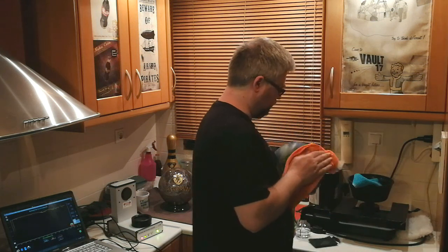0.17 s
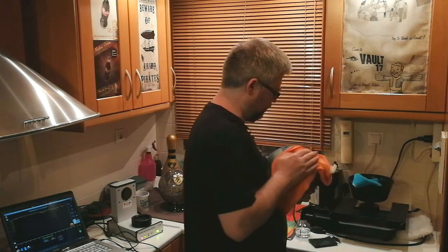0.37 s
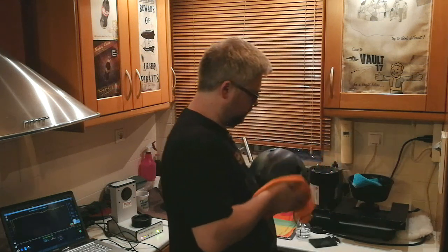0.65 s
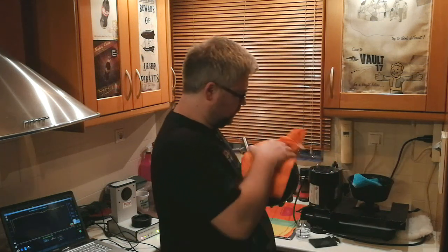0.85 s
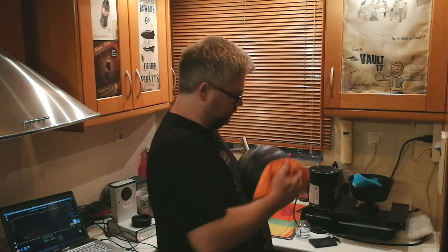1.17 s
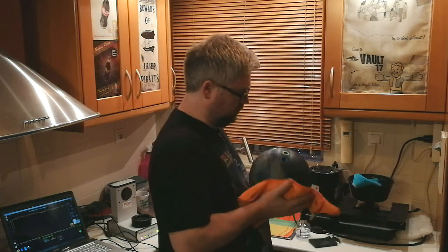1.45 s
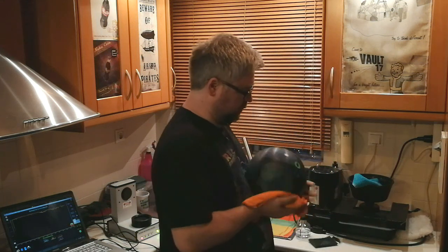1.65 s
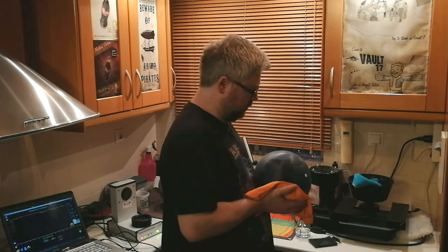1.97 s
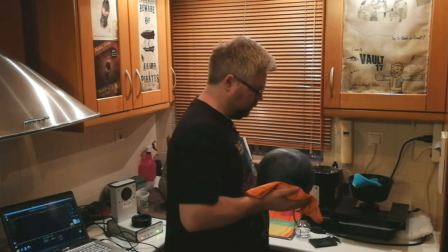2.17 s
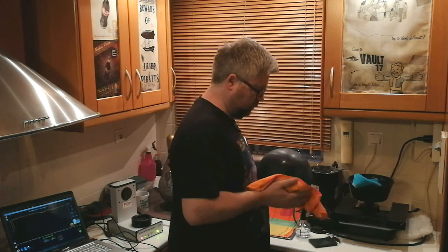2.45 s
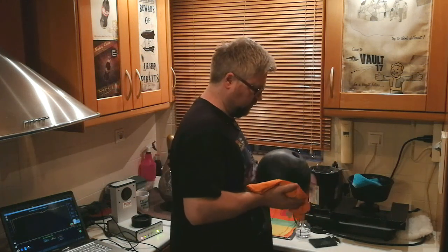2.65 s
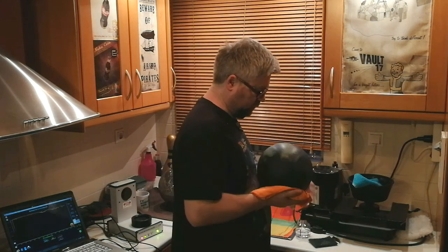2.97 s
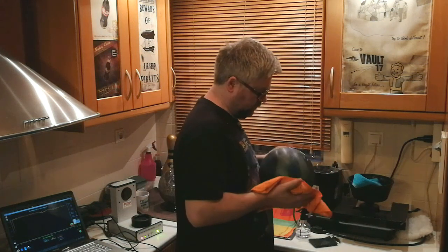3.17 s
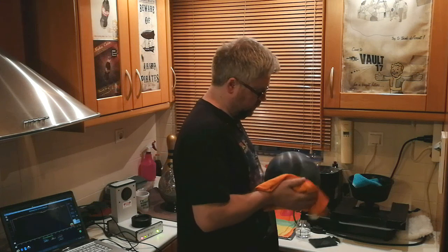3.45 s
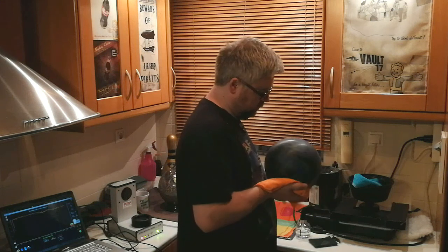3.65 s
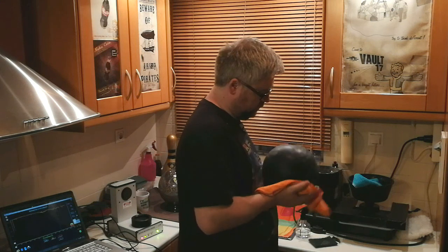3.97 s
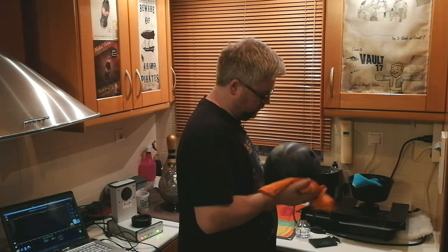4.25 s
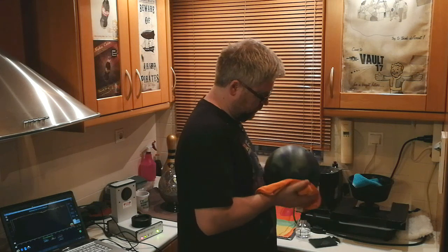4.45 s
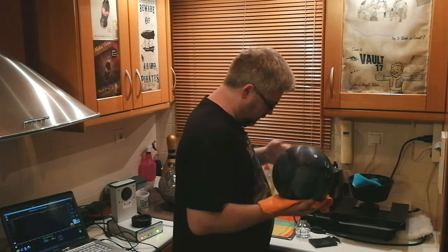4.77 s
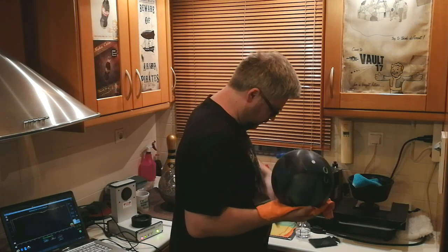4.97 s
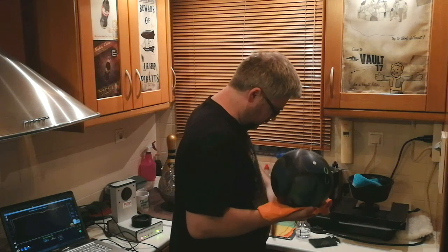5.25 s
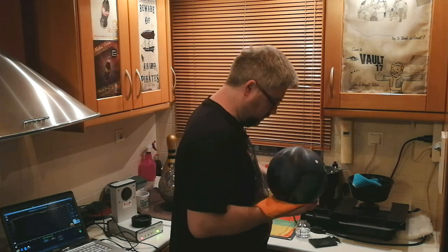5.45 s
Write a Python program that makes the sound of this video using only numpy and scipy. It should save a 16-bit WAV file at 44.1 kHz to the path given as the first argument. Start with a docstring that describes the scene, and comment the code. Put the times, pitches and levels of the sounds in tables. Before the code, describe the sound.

A cloth hisses over a bowling ball in uneven strokes throughout, close to a chest-worn microphone, with the strongest wipes from about 0.5 to 1.2 seconds. Light finger taps come around 1 second, and the ball's weight lands on the hands in soft, low thuds as it turns. Clearer clicks fall at about 2.4, 2.7, 3.1 and 3.5 seconds, some with a brief hollow note from the finger holes, followed by a sharper knock at 3.8. The fabric whistles faintly as the ball spins, mostly between 4.3 and 4.9 seconds. At 5 seconds the ball bumps the shirt with a heavy, dull knock, a short scrape and a few taps. A softer bump and scrape follow at 5.3. Dull rustling, low handling rumble and the faint steady noise of a quiet kitchen lie underneath, with almost no echo.

```python
"""A cloth hisses in uneven strokes over a bowling ball, turned close to a chest-worn microphone.
Slipping fibres make the hiss, and the weave whistles faintly when the ball spins. Fingers tap the
ball and sound the air in its holes; its weight thuds on the hands. Near the end it twice bumps the
shirt, with a heavy knock and a short scrape each time. Beneath lie rustle, rumble and a quiet kitchen."""
import sys
import numpy as np
from scipy import signal
from scipy.fft import rfft, next_fast_len
from scipy.io import wavfile
from scipy.ndimage import uniform_filter1d

SR = 44100
rng = np.random.default_rng(int(sys.argv[2]) if len(sys.argv) > 2 else 0)


def generate_wav(signal):
    """Clip the signal to [-1, 1] and save it as 16-bit WAV at the path in sys.argv[1]."""
    frames = np.transpose(np.atleast_2d(signal))
    scaled = np.clip(frames, -1, 1) * 32767
    pcm = np.round(scaled).astype(np.int16)
    wavfile.write(sys.argv[1], SR, pcm)


N = 246827
TIME = np.arange(N) / SR

# The ball meets the chest. Each row: start in seconds, knock in dB, its tilt in dB per octave,
# slap in dB, drag length in seconds, drag in dB, change over the drag in dB.
BUMPS = [(4.971, -19, 1, -25, 0.158, -38, -1), (5.308, -35.5, -7.5, -45.5, 0.12, -40, -1.5)]


def cloth(gain_db=0.26):
    """Sliding friction makes a broadband hiss that follows the hand's pressure and speed."""
    spectrum = [(700, -9), (1500, -7.5), (2300, -7.5), (2700, -1.5), (3200, 1.5), (4300, 2), (5200, 1),
                (6300, 2), (8000, -3), (10000, -7), (13000, -14.5), (16000, -24)]  # Each row: frequency in Hz, relative density in dB.
    level_db, treble_db = strokes()
    slips = friction(snags_per_s=1000, spread_db=8.5, snag_share=0.033, flutter_db=0.7, flutter_hz=60)
    return amp(level_db + gain_db) * sliding_timbre(colour(slips, spectrum), treble_db)


def strokes(swell_db=10, peakedness=1.05, grab_s=0.026, rest_db=-69.5, rest_treble_db=-4):
    """Incoherent noises add in power: returns the level and mean treble of all strokes, in dB."""
    # Each row: start, length and time to peak in seconds, level in dB, treble in dB (rising with speed).
    wipes = [(-.02, 0.26, 0.037, -58, -11), (0.163, 0.25, 0.054, -51, -6), (.38, 0.16, .11, -53, -8),
             (0.523, 0.21, 0.037, -48, -10), (0.732, 0.4, .19, -46.5, -7), (.95, 0.26, 0.11, -47, -6),
             (1.17, 0.44, 0.086, -58.5, -5), (1.39, 0.24, 0.12, -49, -8), (1.668, 0.058, 0.017, -54, -4),
             (1.725, 0.36, 0.15, -50, -5), (2.035, 0.29, 0.13, -50.5, -5.5), (2.27, 0.3, 0.13, -58, -7),
             (2.45, 0.55, 0.025, -53, -6.5), (2.66, 0.32, 0.22, -52.5, -1.5), (3.073, 0.36, 0.1, -51, -7),
             (3.423, 0.24, .135, -50, -7), (3.68, .38, 0.22, -53, -6), (4.062, 0.043, .02, -54, -2.5),
             (4.115, .29, 0.082, -51.5, -5), (4.385, 0.28, 0.089, -53, -8.5),
             (4.565, 0.29, 0.024, -54.5, -1.5), (4.97, .24, 0.052, -54, -6), (5.31, 0.25, 0.14, -56.5, -2),
             (5.54, .12, 0.08, -55, -8)]
    power = np.full(N, amp(rest_db) ** 2)  # the cloth creeps between strokes
    weighted_treble = power * rest_treble_db
    for start, length, rise, db, treble_db in wipes:
        t = TIME - start
        slack = np.clip(np.maximum(1 - t / rise, (t - rise) / max(length - rise, 1e-3)), 0, 1)
        contact = np.clip(np.minimum(t, length - t) / grab_s, 0, 1)
        stroke = contact * amp(db - swell_db * slack ** peakedness) ** 2
        power += stroke
        weighted_treble += stroke * treble_db
    return 10 * np.log10(power), weighted_treble / power


def friction(snags_per_s, spread_db, snag_share, flutter_db, flutter_hz):
    """Stick-slip friction: countless fibres slip, a few snag harder, under an unsteady hand."""
    snags = (rng.random(N) < snags_per_s / SR) * rng.choice([-1, 1], N)
    strength = amp(spread_db * np.minimum(rng.exponential(1, N), 4))
    slips = np.sqrt(1 - snag_share) * rng.standard_normal(N)
    return (slips + np.sqrt(snag_share) * unit(snags * strength)) * amp(flutter_db * waver(flutter_hz))


def sliding_timbre(x, treble_db, knee_hz=6500, full_hz=11000, neutral_db=-8,
                   patch_db=2.0, patch_hz=520, patch_s=0.059):
    """Faster sliding tilts the spectrum upward; changing folds and gaps add passing resonances."""
    hz, t, spectra = signal.stft(x, SR, nperseg=512, noverlap=384)
    ramp = np.maximum(hz - knee_hz, 0)[:, None] / (full_hz - knee_hz)
    tilt_db = ramp * (np.interp(t, TIME, treble_db) - neutral_db)
    patches = rng.standard_normal(spectra.shape)
    for _ in range(2):
        patches = uniform_filter1d(patches, max(round(patch_hz / hz[1]), 1), axis=0)
        patches = uniform_filter1d(patches, max(round(patch_s / t[1]), 1), axis=1)
    spectra *= amp(tilt_db + patch_db * unit(patches))
    return signal.istft(spectra, SR, nperseg=512, noverlap=384)[1][:N]


def weave(width_hz=110, rasp_width_hz=800, rasp_db=-6, best_hz=8300, falloff_db=14,
          gain_db=-2, grip_db=1.5, coast_s=0.0217):
    """Periodic excitation: passing threads whistle at pitches set by speed; uneven ones rasp."""
    # Each row: start, length and time to top speed in seconds, top thread rate in Hz,
    # share of that rate lost per second away from the peak, level in dB.
    spins = [(1.975, 0.099, 0.011, 6550, 2.1, -73), (2.279, 0.11, 0.045, 7100, 2.5, -68),
             (4.323, 0.16, 0.13, 7520, 2.7, -63.5), (4.687, 0.13, 0.067, 8780, 4.6, -58),
             (4.8, 0.16, 0.041, 6630, 3.03, -59.5)]
    # A lattice has inharmonic partials. Each row: multiple of the thread rate, level in dB.
    lattice = [(.705, -3), (1, -3), (1.24, -4), (1.4, -4), (1.72, -10)]
    out = np.zeros(N)
    for start, length, rise, top_hz, braking, db in spins:
        t = np.arange(round(length * SR)) / SR
        from_peak_s = np.hypot(t - rise, coast_s) - coast_s  # rounded around top speed
        rate_hz = top_hz * np.maximum(1 - braking * from_peak_s, 0.1)
        swell = np.sqrt(np.sin(np.pi * t / length))
        for multiple, row_db in lattice:
            hz = multiple * rate_hz
            whistle = narrow_noise(len(t), hz, width_hz)
            rasp = amp(rasp_db) * narrow_noise(len(t), hz, rasp_width_hz)
            grip = amp(grip_db * waver(rate_hz=21)[:len(t)])  # each row grips by itself
            radiation_db = -falloff_db * np.log2(hz / best_hz) ** 2
            add(out, start, amp(db + row_db + radiation_db + gain_db) * swell * grip * (whistle + rasp))
    return out


def taps(chatter_db=3, gain_db=14, upper_hz=1200):
    """Impulse response: a contact and its dying chatter ring broad modes; padding dulls them."""
    # Finger taps and fabric snags. Each row: start in seconds, level in dB, low-pass corner in Hz,
    # chatter's 60 dB decay time in seconds, hardness as a lift of the upper modes in dB.
    contacts = [(0.06, -40.5, 4470, 0.059, 6), (.868, -38, 1000, .04, -2), (0.981, -38.5, 1400, .033, 8),
                (1.107, -38.5, 1400, 0.073, 14.5), (1.29, -46, 1400, .035, 4),
                (2.437, -31, 7000, 0.0072, 0), (2.438, -28.5, 3020, 0.08, -5.5),
                (2.748, -28.5, 2540, 0.022, -8.5), (3.118, -36.5, 3500, .012, -9),
                (3.127, -30, 5900, 0.037, -9), (3.482, -33.5, 1200, 0.011, -2),
                (3.499, -29.5, 890, 0.095, -11), (3.82, -34, 4500, 0.037, -11),
                (3.8307, -22, 4470, 0.23, -6), (4.375, -47, 9000, 0.015, 13), (4.988, -21, 640, 0.035, -7),
                (5.012, -25, 1900, 0.021, 3), (5.07, -32, 1300, .025, -14),
                (5.1195, -29, 4000, 0.04, -15.5), (5.326, -28, 1900, 0.025, -10.5)]
    modes = [(290, 540, 0), (480, 170, -3.5), (720, 170, -2), (1070, 89, -10), (1160, 310, -22),
             (1960, 160, -23), (3640, 540, 9.5), (5140, 700, 11), (10900, 3400, 9.5)]  # Each row: frequency and bandwidth in Hz, level in dB.
    out, t = np.zeros(N), np.arange(SR // 8) / SR
    for start, db, corner_hz, t60, hard_db in contacts:
        chatter = rng.standard_normal(len(t)) * np.exp(-np.log(1000) * t / t60)
        force = (t == 0) + amp(chatter_db) * chatter / np.linalg.norm(chatter)
        ring = sum(amp(mode_db + hard_db * (hz > upper_hz)) * resonate(force, hz, width)
                   for hz, width, mode_db in modes)
        ring = band(ring, corner_hz, "lowpass")
        add(out, start, amp(db + gain_db) * ring / np.linalg.norm(ring))
    return out


def holes(overtone_ratio=3.62, width_ratio=0.53, fall=2.0, pop_s=0.0025, release_share=0.29):
    """Air resonance: a finger hole or cupped hand is a short stopped pipe with one overtone."""
    # Each row: start, length and time to peak in seconds, pitch and bandwidth in Hz,
    # level and relative overtone level in dB.
    hollows = [(0.249, 0.52, 0.22, 663, 130, -57.5, -13), (0.598, 0.05, 0.032, 844, 140, -52.5, -7),
               (0.636, 0.18, 0.078, 690, 120, -53, -16), (2.44, 0.039, 0.00068, 1383, 100, -43, -25),
               (2.676, 0.11, 0.087, 2240, 700, -54, -23), (3.128, .27, 0.013, 922, 80, -63, -4),
               (3.475, 0.42, .023, 776, 196, -54, -5.5), (4.665, 0.16, 0.086, 1850, 910, -61, -13)]
    out = np.zeros(N)
    for start, length, rise, hz, width, db, overtone_db in hollows:
        t = np.arange(round(length * SR)) / SR
        swell = np.minimum(t / rise, 1) * np.exp(-fall * np.maximum(t - rise, 0) / length)
        release = np.minimum((1 - t / length) / release_share, 1)
        free_share = np.exp(-rise / pop_s)  # sudden unplugging rings; slow rubbing only blows
        ring = np.sqrt(2 * free_share) * np.sin(2 * np.pi * hz * t)
        breath = np.sqrt(1 - free_share) * narrow_noise(len(t), hz, width)
        overtone = amp(overtone_db) * narrow_noise(len(t), overtone_ratio * hz, width_ratio * width)
        add(out, start, amp(db) * swell * release * (ring + breath + overtone))
    return out


def knocks(slap_rise_s=0.018, pivot_hz=107):
    """An impact excites the chest's damped low modes and slaps the shirt flat."""
    modes = [(59, 3, 0.015), (107, -1.5, 0.02), (158.4, 2, 0.014), (323, -12.5, 0.017)]  # Each row: frequency in Hz, level in dB, time to peak in seconds.
    spectrum = [(120, 7.5), (240, 4.5), (400, -2), (490, 1), (620, -10.5), (780, -2.5), (1050, -7.5),
                (1500, -12.5), (2100, -18), (4000, -21.5), (9000, -48)]  # Each row: frequency in Hz, relative density in dB.
    out, t = np.zeros(N), np.arange(SR // 5) / SR
    for start, knock_db, tilt_db, slap_db, *_ in BUMPS:
        boom = sum(amp(db + tilt_db * np.log2(hz / pivot_hz))
                   * cushion(t, rise) * np.sin(2 * np.pi * hz * t) for hz, db, rise in modes)
        slap = cushion(t, slap_rise_s) * colour(rng.standard_normal(len(t)), spectrum)
        add(out, start, amp(knock_db) * boom + amp(slap_db) * slap)
    return out


def scrapes(edge_s=0.016, lag_s=0.003):
    """Friction starts and stops abruptly as the ball drags on the shirt at each bump."""
    spectrum = [(100, 6), (200, 3.5), (330, -5), (480, -6), (750, -10.5), (1100, -16), (2200, -19.5),
                (3000, -15.5), (3600, -8.5), (4800, -6.5), (8000, -11.5), (12600, -17), (16000, -27)]  # Each row: frequency in Hz, relative density in dB.
    grip = np.zeros(N)
    for start, *_, length, db, change_db in BUMPS:
        t = TIME - start
        gate = np.clip(np.minimum(t - lag_s, length - t) / edge_s, 0, 1)
        grip += gate * amp(db + change_db * np.clip(t / length, 0, 1))
    slips = friction(snags_per_s=1000, spread_db=0, snag_share=0.21, flutter_db=1.1, flutter_hz=80)
    return grip * colour(slips, spectrum)


def thuds(rise_cycles=0.75):
    """Heavy damping: the ball landing on a hand gives only a few low cycles."""
    landings = [(.876, -44.5, 69), (1.448, -42, 66), (1.884, -37, 65.4), (2.421, -36, 80), (2.52, -43, 83),
                (2.748, -36, 59), (2.842, -35, 80), (3.118, -36.5, 83), (3.549, -45, 61.6),
                (3.822, -36, 153), (3.833, -37.5, 63), (4.119, -37.5, 59), (4.212, -40, 86.6),
                (4.485, -42, 80), (5.059, -31, 103), (5.122, -33.5, 64), (5.397, -37.5, 72)]  # Each row: start in seconds, level in dB, pitch in Hz.
    out, t = np.zeros(N), np.arange(SR // 5) / SR
    for start, db, hz in landings:
        add(out, start, amp(db) * cushion(t, rise_cycles / hz) * np.sin(2 * np.pi * hz * t))
    return out


def handling(rustle_gain_db=4, rumble_gain_db=3):
    """Friction in crumpling folds rustles dully, and the moving body rumbles in the microphone."""
    movement = [(0.0, -62, -65.5), (0.33, -63.5, -62.5), (0.51, -60.5, -68.5), (1.09, -61, -62),
                (1.54, -64.5, -65), (1.95, -62.5, -60), (2.15, -64, -64.5), (3.12, -66, -62.5),
                (3.37, -64.5, -59), (4.82, -60, -68), (5.0, -64, -69), (5.19, -64.5, -60.5),
                (5.46, -60, -77), (5.6, -67.5, -71)]  # Each row: time in seconds, rustle and rumble in dB.
    # Two spectra. Each row: frequency in Hz, relative density in dB.
    rustle_spectrum = [(100, -12), (180, 4.5), (270, 4.5), (400, 1), (700, 1.5), (900, -3), (1300, -5),
                       (1900, -9.5), (2500, -9.5), (3600, -32), (7000, -51)]
    rumble_spectrum = [(15, -37), (35, -3), (58, -1.5), (90, -4.5), (160, -10), (260, -21), (500, -71)]
    times, rustle_db, rumble_db = np.transpose(movement)
    folds = friction(snags_per_s=200, spread_db=-0.5, snag_share=0.24, flutter_db=1.5, flutter_hz=21.4)
    rustle = amp(np.interp(TIME, times, rustle_db) + rustle_gain_db) * colour(folds, rustle_spectrum)
    body = colour(rng.standard_normal(N), rumble_spectrum)
    return rustle + amp(np.interp(TIME, times, rumble_db) + rumble_gain_db) * body


def kitchen_echo(x, t60=0.089, wet_db=-17, dull_hz=5000, delay_s=0.006):
    """Reverberation: reflections from cupboards and walls add a faint, exponentially dying tail."""
    t = np.arange(SR // 2) / SR
    reflections = rng.standard_normal(len(t)) * (t > delay_s) * np.exp(-np.log(1000) * t / t60)
    tail = band(reflections, dull_hz, "lowpass")
    return x + amp(wet_db) * signal.fftconvolve(x, tail / np.linalg.norm(tail))[:N]


def room_noise(level_db=-63):
    """The kitchen's noise floor is steady and strongest in the bass."""
    spectrum = [(25, -25), (60, 5), (130, -6), (200, -11.5), (400, -8.5), (900, -17.5), (1700, -19),
                (4000, -21), (8000, -41), (16000, -41)]  # Each row: frequency in Hz, relative density in dB.
    return amp(level_db) * colour(rng.standard_normal(N), spectrum)


def amp(db):
    """Decibels to amplitude ratio."""
    return 10 ** (np.asarray(db) / 20)


def unit(x):
    """Scales to an rms of one."""
    return x / np.sqrt(np.mean(x ** 2) + 1e-20)


def add(mix, start, sound):
    """Superposes a sound at start seconds."""
    part = mix[max(round(start * SR), 0):][:len(sound)]
    part += sound[:len(part)]


def colour(x, spectrum):
    """Filters x by a curve of (Hz, dB) points, to an rms of one."""
    hz, db = np.transpose(spectrum)
    size = next_fast_len(len(x) + 2048)
    gain = amp(np.interp(np.log(np.fft.rfftfreq(size, 1 / SR) + 1), np.log(hz), db))
    return unit(np.fft.irfft(rfft(x, size) * gain, size)[:len(x)])


def band(x, edge_hz, kind, order=2):
    """A filter with a maximally flat passband."""
    return signal.sosfilt(signal.butter(order, edge_hz, kind, fs=SR, output="sos"), x)


def resonate(x, hz, width_hz):
    """A resonance of gain one at hz, steady or gliding."""
    phasor = np.exp(2j * np.pi * np.cumsum(hz * np.ones(len(x))) / SR)
    pole = np.exp(-np.pi * width_hz / SR)
    return 2 * (phasor * signal.lfilter([1 - pole], [1, -pole], x / phasor + 1e-18)).real


def narrow_noise(count, hz, width_hz):
    """Noise passed twice through a resonance takes on its pitch."""
    return unit(resonate(resonate(rng.standard_normal(count), hz, width_hz), hz, width_hz))


def waver(rate_hz):
    """A slow random fluctuation with an rms of one."""
    return unit(band(rng.standard_normal(N), rate_hz, "lowpass"))


def cushion(t, rise_s, steepness=2.14):
    """The envelope of a padded impact swells to one at rise_s and dies."""
    return (t / rise_s * np.exp(1 - t / rise_s)) ** steepness


def scene():
    """The sources superpose at one microphone, which feeds both channels."""
    room = room_noise()
    mix = cloth() + weave() + handling() + thuds() + knocks()
    mix += kitchen_echo(taps() + holes()) + scrapes() + room
    return np.array([mix, mix])


def record(dry, low_cut_hz=38, high_cut_hz=15900):
    """Band limiting: the microphone sheds the deepest bass, and a steep filter the highest treble."""
    thinned = band(dry, low_cut_hz, "highpass", order=3)
    lowpass = signal.firwin(511, high_cut_hz, window=("kaiser", 9), fs=SR)
    return signal.oaconvolve(thinned, lowpass[None], "same", axes=1)


dry = scene()
out = record(dry)
generate_wav(out)
```